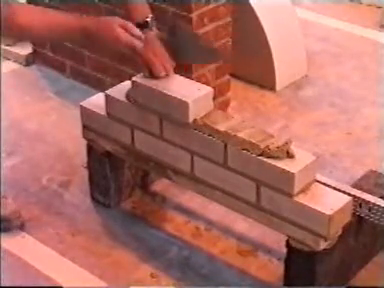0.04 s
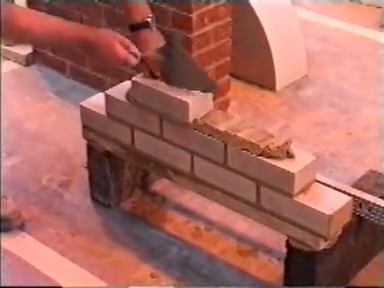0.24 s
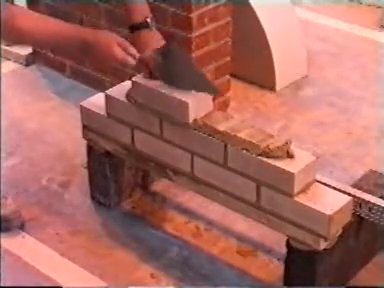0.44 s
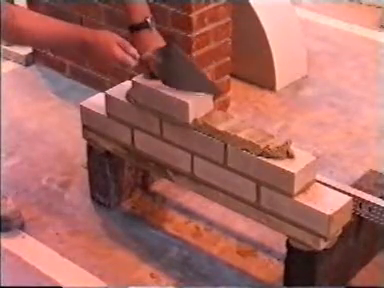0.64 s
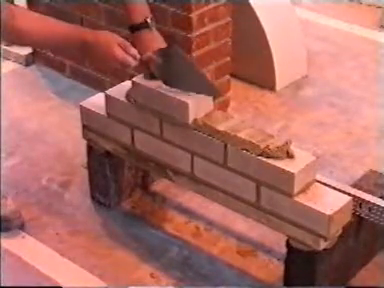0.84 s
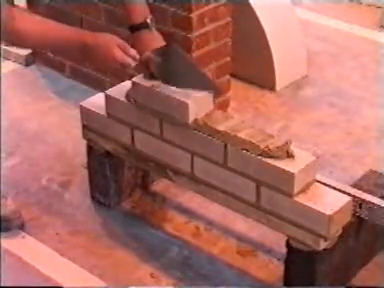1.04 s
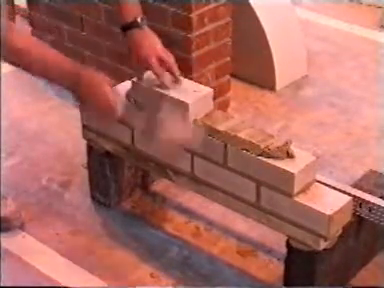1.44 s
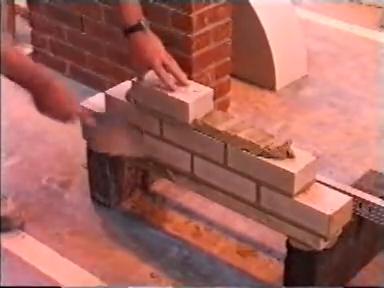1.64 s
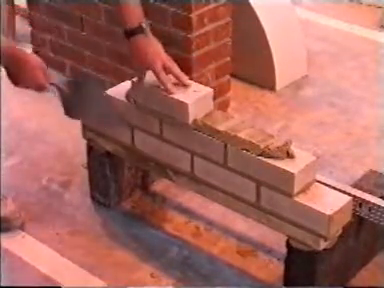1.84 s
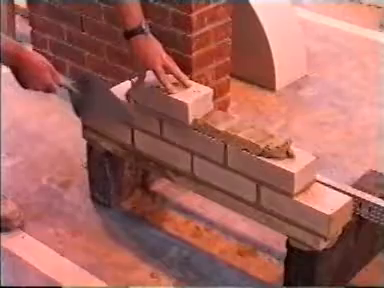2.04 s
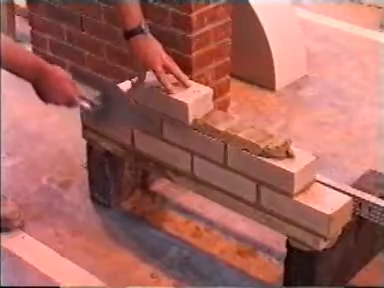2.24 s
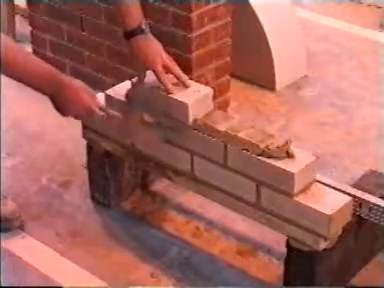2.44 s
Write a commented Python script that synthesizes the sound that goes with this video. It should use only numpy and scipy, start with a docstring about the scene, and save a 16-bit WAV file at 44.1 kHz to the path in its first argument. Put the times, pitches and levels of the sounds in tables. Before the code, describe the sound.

A steel trowel taps a brick into mortar six times between about 0.2 and 1.1 seconds, quickening slightly, each a dull knock with a short metallic ring. At 1.8 seconds the blade clinks against the wall, then scrapes grittily along the joint from 1.9 to 2.6 seconds, catching on a few lumps. The large workshop echoes, over faint ventilation rumble, distant machine hum and microphone hiss.

```python
"""A steel trowel taps a brick down into its mortar six times, in a large, hard-walled workshop.
Each tap is a dull knock, a short ring of the blade and a quick second contact. The blade then clinks
against the wall and scrapes along the joint, rattled by sand grains.
Ventilation rumbles and a machine hums far off; the microphone is nearly mono and hisses."""
import sys
import numpy as np
from scipy import signal
from scipy.fft import rfft, irfft
from scipy.io import wavfile

SR = 44100
rng = np.random.default_rng(int(sys.argv[2]) if len(sys.argv) > 2 else 0)


def materialize(psi):
    """Save the field psi as 16-bit PCM at rate SR to the path in sys.argv[1].

    A 1-D psi becomes a single channel; in a 2-D psi each row is a channel.
    """
    bounded = np.clip(np.atleast_2d(psi).T, -1, 1)
    quanta = np.round(bounded * 32767).astype(np.int16)
    wavfile.write(sys.argv[1], SR, quanta)


N = 114660


def amp(db):
    """dB to gain."""
    return 10 ** (np.asarray(db) / 20)


def unit(x):
    """Scale to rms 1."""
    return x / np.sqrt(np.mean(x ** 2) + 1e-20)


def decay(t, t60_s):
    """Envelope falling 60 dB in t60_s."""
    return np.exp(-np.log(1000) * t / t60_s)


def read(table, hz):
    """Interpolate (f/Hz, value) rows over log frequency."""
    table_hz, values = np.transpose(table)
    return np.interp(np.log(hz + 1), np.log(table_hz + 1), values)


def add(mix, at_s, sound):
    """Mix a sound in at at_s."""
    part = mix[max(round(at_s * SR), 0):][:len(sound)]
    part += sound[:len(part)]


def drift(hz):
    """Random wander of rms 1, low-passed at hz."""
    rolloff = 1 + (np.fft.rfftfreq(N, 1 / SR) / hz) ** 4
    return unit(irfft(rfft(rng.standard_normal(N)) / rolloff, N))


def click(spectrum, boost_db=lambda hz: 0, size=4096):
    """Minimum-phase click from (f/Hz, level/dB) rows plus boost_db(hz)."""
    hz = abs(np.fft.fftfreq(size, 1 / SR))
    log_gain = np.log(amp(read(spectrum, hz) + boost_db(hz)))
    return np.fft.ifft(np.exp(np.conj(signal.hilbert(log_gain)))).real[:size // 2]


def ring(modes):
    """0.5 s of decaying modes, neighbours in opposite phase."""
    t = np.arange(SR // 2) / SR
    return sum((-1) ** k * amp(db) * decay(t, t60_s) * np.sin(2 * np.pi * hz * t)
               for k, (hz, db, t60_s) in enumerate(modes))


def resonate(x, hz, width_hz):
    """Unity-gain resonance following the curve hz."""
    carrier = np.exp(2j * np.pi * np.cumsum(hz) / SR)
    pole = np.exp(-np.pi * width_hz / SR)
    return 2 * (carrier * signal.lfilter([1 - pole], [1, -pole], x / carrier + 1e-18)).real


def rumble_and_hiss():
    """Ventilation rumble and microphone hiss, nearly alike in both channels."""
    spectrum = [(12, -42), (20, 2.5), (179, -5.5), (302, -9.5), (337, -9), (522, -15), (567, -13.5),
                (787, -15), (1040, -18.5), (1190, -21), (1480, -17), (1950, -16.5), (14000, -23.5)]  # noise shape: f/Hz, level/dB
    coherence = [(30, .98), (5000, .985), (10000, .985), (12500, .89)]  # left-right likeness: f/Hz, coherence
    balance = [(30, .6), (100, .2), (400, .8), (1500, .7), (5000, .1), (9000, .1), (13000, .7)]  # left over right: f/Hz, level/dB
    hz = np.fft.rfftfreq(N, 1 / SR)
    left, independent = rfft(rng.standard_normal((2, N))) * amp(read(spectrum, hz))
    same = read(coherence, hz)
    right = same * left + np.sqrt(1 - same ** 2) * independent
    pan = amp(np.outer([.5, -.5], read(balance, hz)))
    return amp(-47.5) * unit(irfft(np.array([left, right]) * pan, N))


def machine_hum():
    """Distant machine: steady tones, each wavering in pitch."""
    tones = [(49, -71), (175.4, -58), (300, -68), (526, -63), (877, -65.5), (1226, -65)]  # hum lines: f/Hz, rms level/dB
    waver_hz = 1.604
    return sum(np.sqrt(2) * amp(db) * np.sin(2 * np.pi * np.cumsum(hz + waver_hz * drift(hz=5.6)) / SR)
               for hz, db in tones)


def workshop(x):
    """Quick reflections from floor and brickwork, then the hall's long tail."""
    bands = [(100, 0.23, 2.5, -5), (417, 1.7, -10, -8.5), (970, 1.56, -3, -4), (1570, 1.55, -1.5, 0),
             (3180, 1.4, -8, -7), (5000, 1, -9.5, -6.5), (10200, .4, -61.5, -6)]  # reverberation: f/Hz, tail t60/s, tail level/dB, near level/dB
    near_t60_s, near_rise_s, tail_rise_s = 0.19, 0.0027, 0.0067
    size, density, stereo_width = 2 * SR, .1, 0.06
    t, hz = np.arange(size) / SR, np.fft.rfftfreq(size, 1 / SR)
    echoes = rfft(rng.choice([-1., 1.], (2, size)) * (rng.random((2, size)) < density))
    log_centres = np.log([row[0] for row in bands])
    response = 0
    for selector, (_, t60_s, tail_db, near_db) in zip(np.eye(len(bands)), bands):
        band_gain = np.interp(np.log(hz + 1), log_centres, selector)
        band = irfft(echoes * band_gain, size) / np.sqrt(density * size)
        near = unit((1 - np.exp(-(t / near_rise_s) ** 2)) * decay(t, near_t60_s))
        tail = unit((1 - np.exp(-t / tail_rise_s)) * decay(t, t60_s))
        response = response + band * np.hypot(amp(near_db) * near, amp(tail_db) * tail)
    mid, side = signal.fftconvolve(x[None], response, axes=1)[:, :N]
    return mid + stereo_width * np.array([side, -side])


def contact(size=2048):
    """Force of one blow: an impulse, then a brief crunch of grit."""
    crunch_s, crunch_db, highpass_hz = 0.0025, 2, 750
    force = rng.standard_normal(size) * np.exp(-np.arange(size) / SR / crunch_s)
    force = signal.lfilter(*signal.butter(2, highpass_hz, "high", fs=SR), force)
    force *= amp(crunch_db) / np.linalg.norm(force)
    force[0] = 1
    return force


def smear(x, max_delay_s=0.0015, top_hz=5090):
    """The blade spreads a blow in time below top_hz; magnitudes unchanged."""
    hz = np.fft.rfftfreq(len(x), 1 / SR)
    delay_s = max_delay_s * np.sin(np.pi * np.minimum(hz / top_hz, 1)) ** 2
    return irfft(rfft(x) * np.exp(-2j * np.pi * np.cumsum(delay_s) * hz[1]), len(x))


def scrape():
    """Sand grains rattle the juddering blade, whose resonances sink as it gathers mortar."""
    stroke = [(1.93, -11.5, 945), (1.99, -5, 958), (2.041, -5, 990), (2.09, -4, 975), (2.111, 3, 985),
              (2.15, -2, 980), (2.22, -0.5, 945), (2.245, -3.5, 930), (2.275, -1.5, 986), (2.3, -4.5, 960),
              (2.324, -0.5, 968), (2.43, -3.5, 952), (2.47, -9.5, 990), (2.515, -10, 930), (2.528, 0, 895),
              (2.561, -7, 884), (2.6, -6.5, 970)]  # blade along the joint: t/s, pressure/dB, lowest resonance f/Hz
    lumps = [(2.11, 20), (2.2253, 26), (2.523, 20)]  # soft lumps catching the edge: t/s, level/dB
    upper_modes = [(1620, 97, -2.5), (2260, 120, -6.5), (2580, 89, -8.5), (3015, 66, -8), (3220, 60, -18),
                   (3890, 76, -5), (4330, 67, -14), (4930, 130, -16), (5800, 150, -19)]  # dragged blade: f/Hz, width/Hz, level/dB
    rasp_spectrum = [(60, -24), (300, -27.5), (550, -10), (720, -22.5), (1150, -9.5), (2000, -12),
                     (4500, -10.5), (6000, -16), (7500, -23.5), (13000, -57)]  # sand: f/Hz, level/dB
    grains_per_s, spread_db, judder_db, lump_cutoff_hz = 2500, 2.5, 1, 2640
    grip_wobble_hz, wander_share = 15, 0.0082
    stroke_s, pressure_db, stroke_hz = np.transpose(stroke)
    t = np.arange(N) / SR
    grains = (rng.random(N) < grains_per_s / SR) * rng.choice([-1, 1], N)
    grains = grains * amp(spread_db * np.minimum(rng.exponential(1, N), 4))
    pressure = amp(np.interp(t, stroke_s, pressure_db) + judder_db * drift(hz=70))
    force = unit(grains) * pressure * (t > stroke_s[0])
    for at_s, db in lumps:
        add(force, at_s, amp(db) * signal.lfilter(*signal.butter(1, lump_cutoff_hz, fs=SR), contact()))
    lowest_hz = np.interp(t, stroke_s, stroke_hz) + grip_wobble_hz * drift(hz=24.7)
    bend = (lowest_hz / stroke_hz.mean()) ** .4  # upper modes partly follow the lowest
    blade = amp(7) * resonate(force, lowest_hz, width_hz=52)
    for hz, width_hz, db in upper_modes:
        wander = 1 + wander_share * drift(hz=11.5)  # contact point shifts
        blade += amp(db) * resonate(force, hz * bend * wander, width_hz)
    rasp = signal.fftconvolve(force, click(rasp_spectrum))[:N]
    return amp(-27.5) * (blade + rasp)


def clinks():
    """The edge touches the wall; the firmest touch rings the blade until it settles on the brick."""
    touches = [(1.7885, -2.5), (1.7935, -0.5), (1.835, -8)]  # edge on wall: t/s, level/dB
    tick_spectrum = [(100, 3), (500, -12), (1000, -1), (1350, -12), (2100, -5), (3000, 0), (5000, -8),
                     (7000, -19), (13000, -43)]  # one touch: f/Hz, level/dB
    free_modes = [(690, -53, .35), (985, -44, .09), (1692, -41, .19), (2685, -46, .11), (3070, -45, .11),
                  (3330, -51, .12), (3610, -50, .11), (3960, -53, .11), (4530, -49, .08), (5650, -50, .08)]  # undamped blade: f/Hz, level/dB, t60/s
    settle_s = 1.838
    ticks, ringing = np.zeros((2, N))
    for at_s, db in touches:
        add(ticks, at_s, amp(db) * signal.fftconvolve(contact(), smear(click(tick_spectrum))))
    firmest_s, _ = max(touches, key=lambda row: row[1])
    add(ringing, firmest_s, amp(3) * ring(free_modes))
    settled_s = np.maximum(np.arange(N) / SR - settle_s, 0)
    return ticks + ringing * decay(settled_s, t60_s=.05)


def clatter(size=8192, rise_s=0.0035):
    """Dense overtones of blade and handle, dying together."""
    spectrum = [(200, -20), (600, 6), (900, 1), (1300, 1.5), (2000, -0.5), (2700, 11), (3400, 9.5),
                (3800, -1), (4500, 0.5), (6000, -7), (12000, -32)]  # overtone envelope: f/Hz, level/dB
    t = np.arange(size) / SR
    burst = rng.standard_normal(size) * (1 - np.exp(-t / rise_s)) * decay(t, t60_s=0.11)
    return signal.fftconvolve(burst / np.linalg.norm(burst), click(spectrum))


def taps():
    """The trowel knocks the brick, rings, lands again and skids. Returns knocks, ringing."""
    # trowel blows: t/s, level/dB, thud/dB, low ring/dB, high ring/dB, treble/dB,
    # second contact delay/s, second contact relative level/dB
    blows = [(0.2269, -0.5, 1.5, 1, 3, -4, 0.0076, -33), (0.428, -2, 0, -18, 4.5, 1.5, 0.0083, -15),
             (0.6119, 0.5, 1.5, -11, 4, -2.5, 0.014, -17.5), (0.7802, -2, 1, 4, -1.5, -2.5, 0.011, -8),
             (0.9506, -5, 2.5, 10, 7.5, 2, .0115, -2), (1.1005, -7.5, -1, 10.5, 2.5, -13.5, 0.0081, 2)]
    knock_spectrum = [(30, 11), (180, 6), (330, 18.5), (490, 19), (700, 16.5), (900, 13.5), (1300, 8),
                      (1650, 10), (2400, -1.5), (3150, 14), (3700, 5.5), (4350, 11), (5100, -3.5),
                      (6300, -6.5), (7500, -16), (13000, -36.5)]  # steel on bedded brick: f/Hz, level/dB
    blade_modes = [(822, -35, .13), (899, -33, .15), (1345, -40, .13), (1604, -33.5, .15), (1880, -42, .15),
                   (2208, -33, .12), (2307, -28.5, .14), (2695, -34, .15), (3105, -26, .055),
                   (3345, -32, .12), (4000, -43, .12), (4368, -32, .1), (5300, -44, .07), (6250, -44, .07)]  # blade held against the brick: f/Hz, level/dB, t60/s
    brick_modes = [(264, -46, .14), (371, -40, .1), (474, -39, .1), (617, -40, .1)]  # brick on its wet bed: f/Hz, level/dB, t60/s
    skid_spectrum = [(100, -40), (2500, -2), (4500, 4), (6200, -3), (7500, -25), (13000, -19)]  # skidding edge: f/Hz, level/dB
    thud_hz, ring_split_hz, treble_hz = 610, 1500, 4400
    knocks, ringing = np.zeros((2, N))
    for tap_s, tap_db, thud_db, low_db, high_db, treble_db, delay_s, second_db in blows:
        knock = click(knock_spectrum, boost_db=lambda hz: thud_db / (1 + (hz / thud_hz) ** 2)
                      + treble_db * hz ** 2 / (hz ** 2 + treble_hz ** 2))
        blade = ring([(hz, db + (low_db if hz < ring_split_hz else high_db)
                       + treble_db * (hz > treble_hz), t60_s) for hz, db, t60_s in blade_modes])
        for at_s, db in (tap_s, tap_db), (tap_s + delay_s, tap_db + second_db):
            add(knocks, at_s, amp(db) * signal.fftconvolve(contact(), smear(knock)))
            add(knocks, at_s, amp(db + thud_db) * ring(brick_modes))
            add(knocks, at_s, amp(db) * clatter())
            add(ringing, at_s, amp(db) * blade)
        skid = signal.fftconvolve(contact(), click(skid_spectrum))
        add(knocks, tap_s + delay_s, amp(tap_db + second_db) * skid)
    return knocks, ringing


def scene():
    """Trowel and echoes, slightly left, over rumble, hiss and hum."""
    ring_send_db, left_over_right_db = -3, 1.43
    knocks, ringing = taps()
    ringing = ringing + clinks()
    scraping = scrape()
    echoes = workshop(knocks + amp(ring_send_db) * ringing + scraping)
    pan = amp(left_over_right_db * np.array([[.5], [-.5]]))
    return (knocks + ringing + scraping + echoes) * pan + rumble_and_hiss() + machine_hum()


def record(dry):
    """Band limit: steep low-pass."""
    cutoff_hz = 13950
    lowpass = signal.firwin(401, cutoff_hz, window=("kaiser", 7), fs=SR)
    return signal.oaconvolve(dry, lowpass[None], "same")


dry = scene()
out = record(dry)
materialize(out)
```